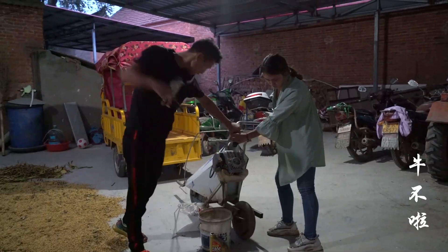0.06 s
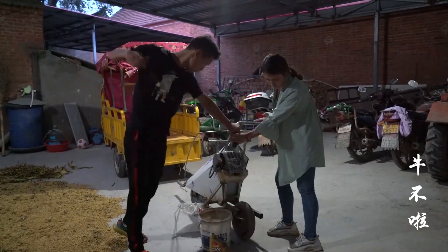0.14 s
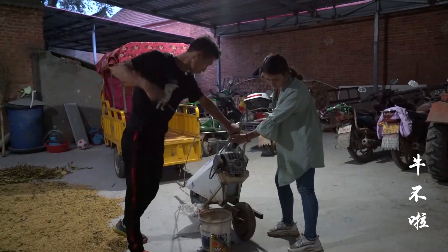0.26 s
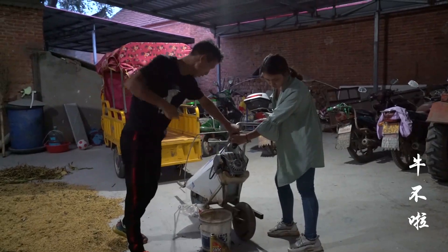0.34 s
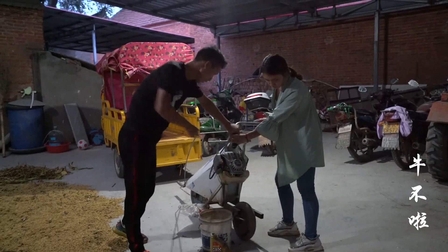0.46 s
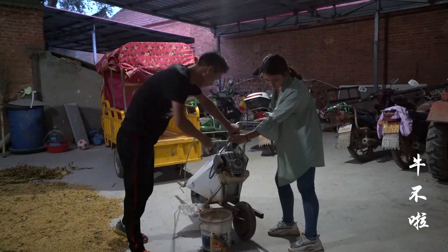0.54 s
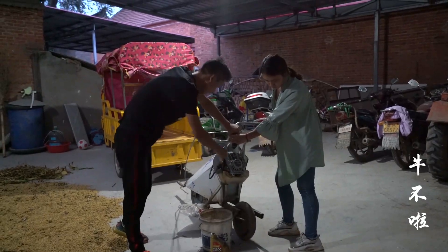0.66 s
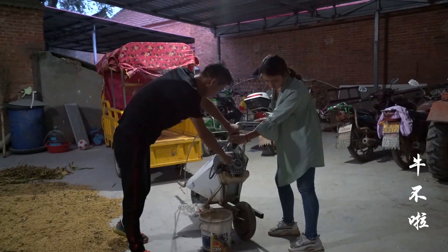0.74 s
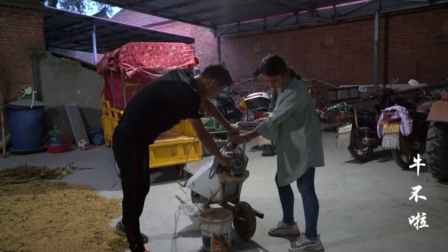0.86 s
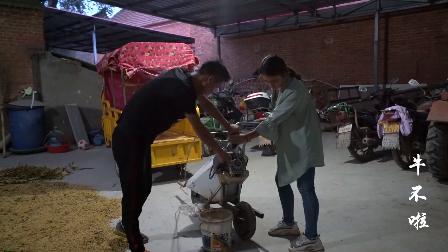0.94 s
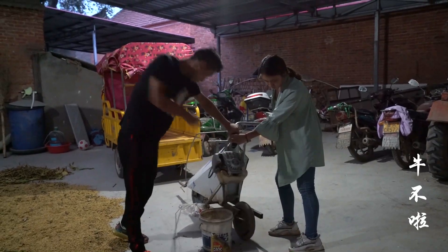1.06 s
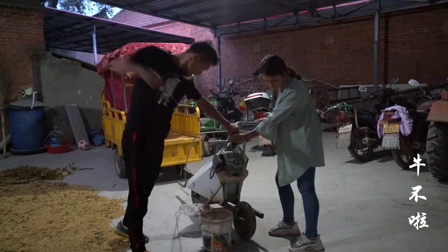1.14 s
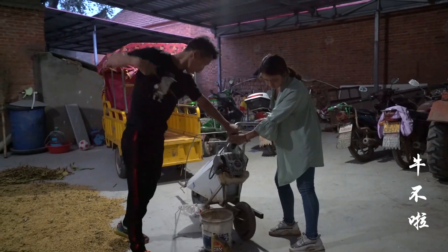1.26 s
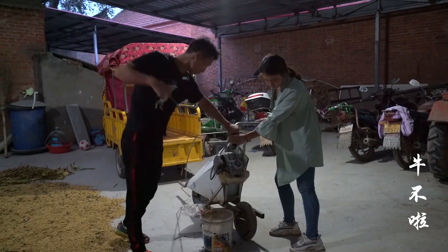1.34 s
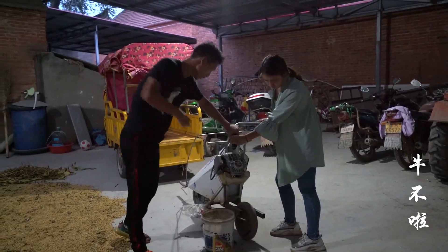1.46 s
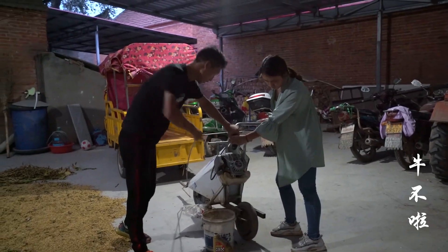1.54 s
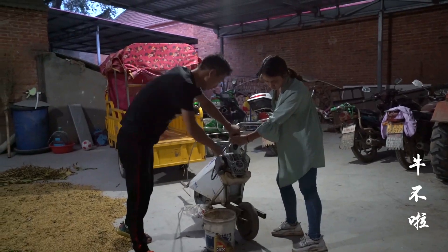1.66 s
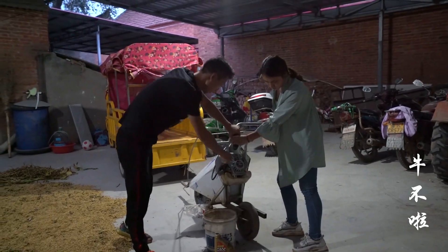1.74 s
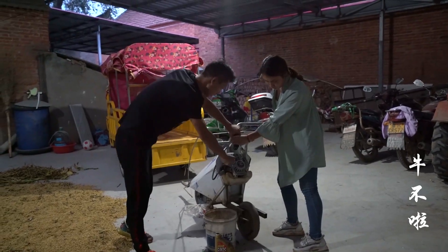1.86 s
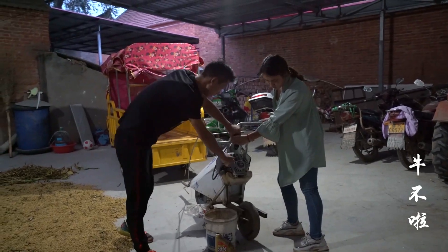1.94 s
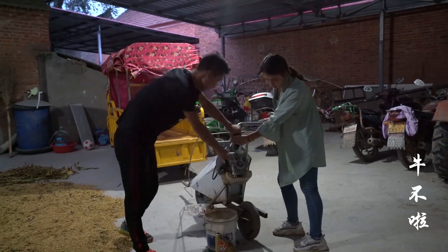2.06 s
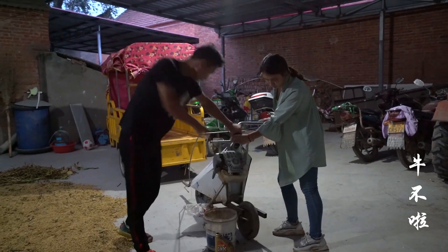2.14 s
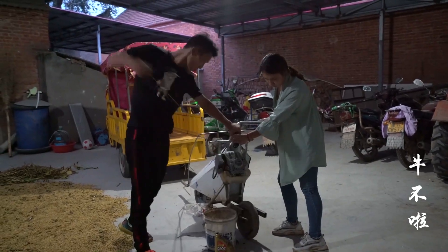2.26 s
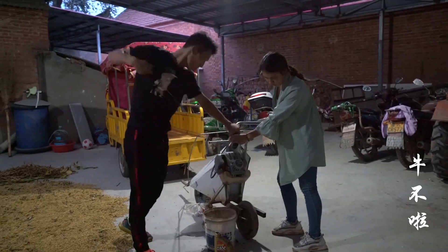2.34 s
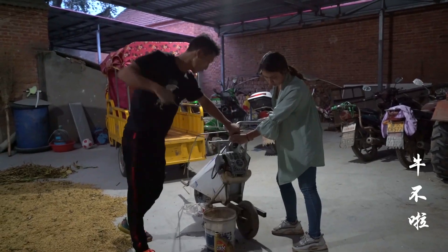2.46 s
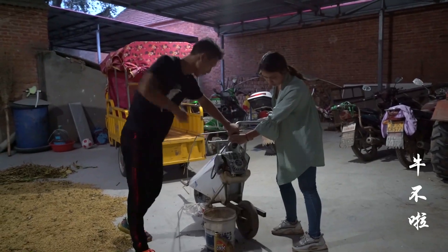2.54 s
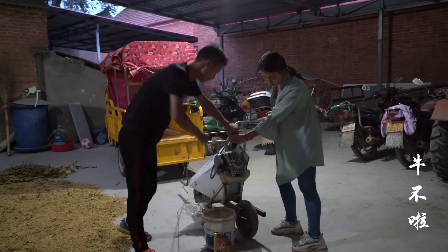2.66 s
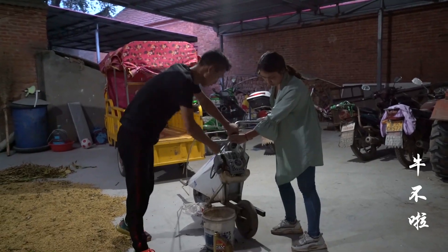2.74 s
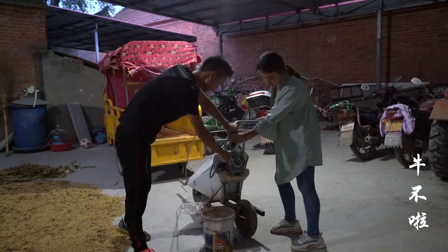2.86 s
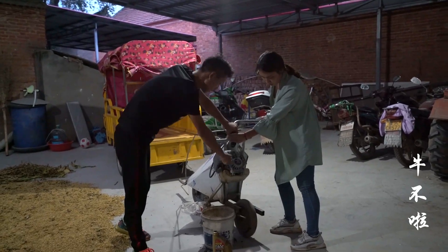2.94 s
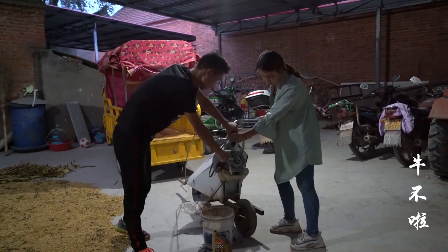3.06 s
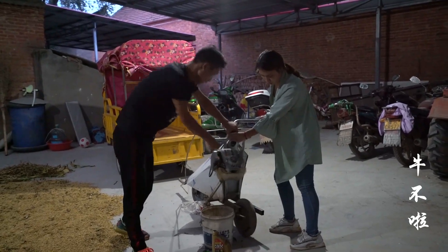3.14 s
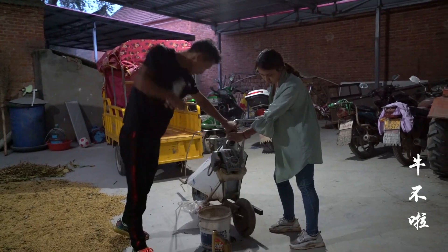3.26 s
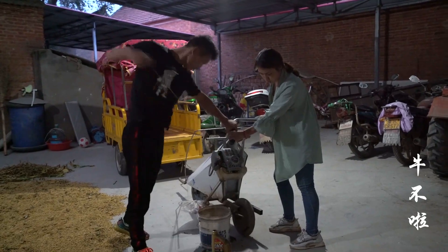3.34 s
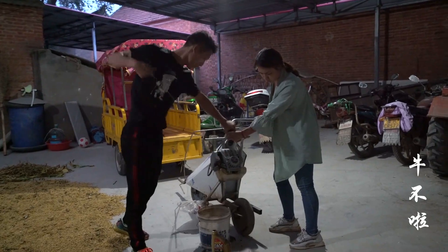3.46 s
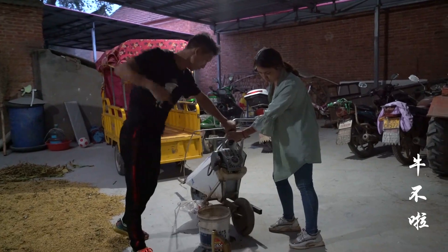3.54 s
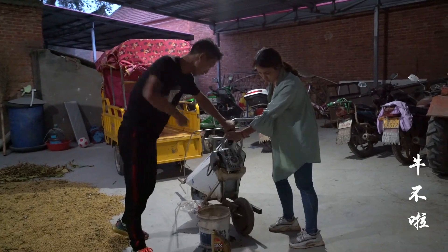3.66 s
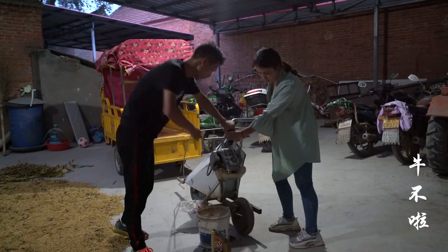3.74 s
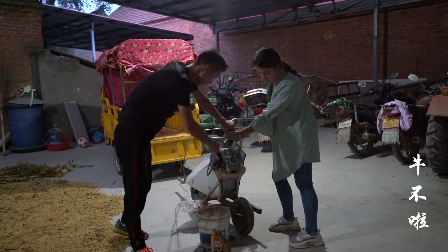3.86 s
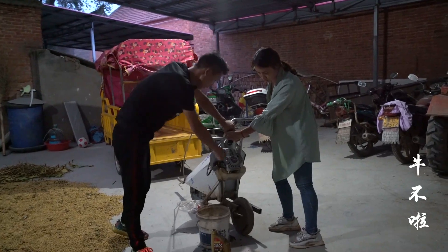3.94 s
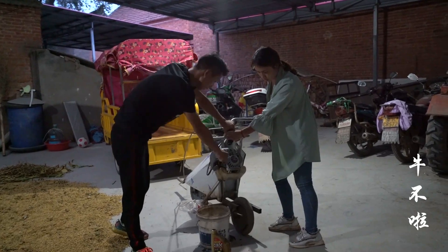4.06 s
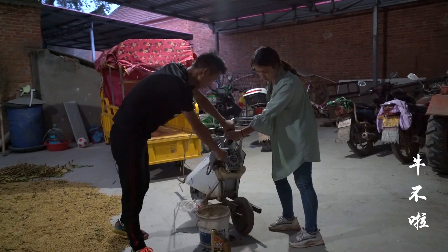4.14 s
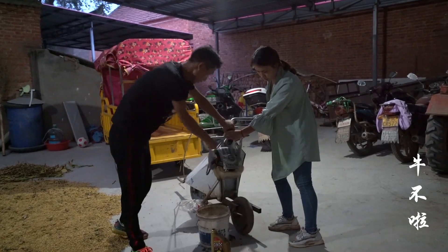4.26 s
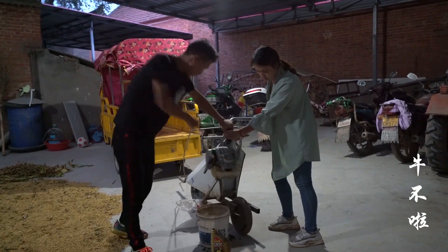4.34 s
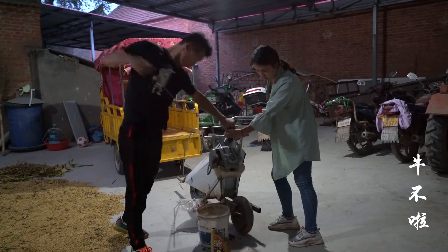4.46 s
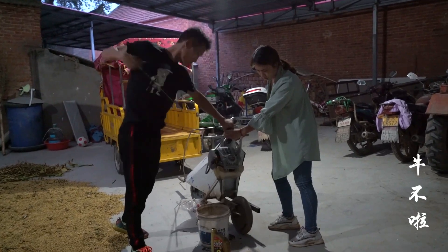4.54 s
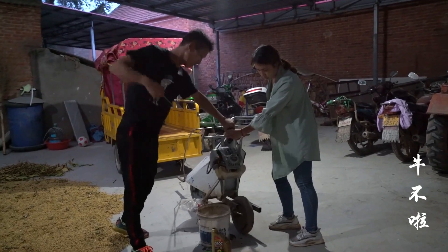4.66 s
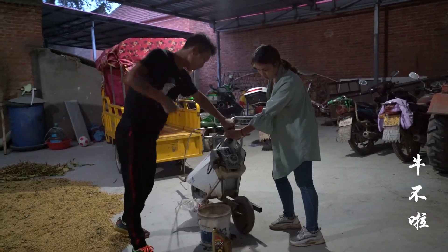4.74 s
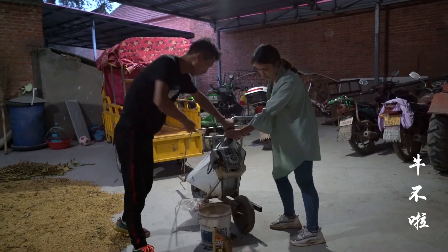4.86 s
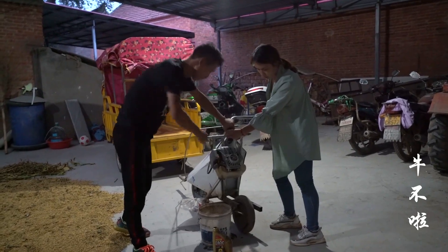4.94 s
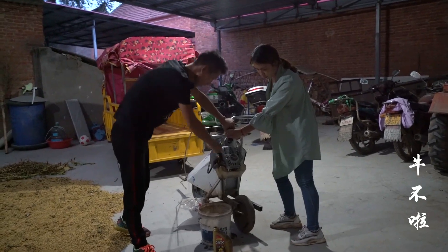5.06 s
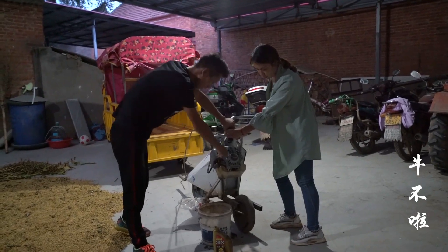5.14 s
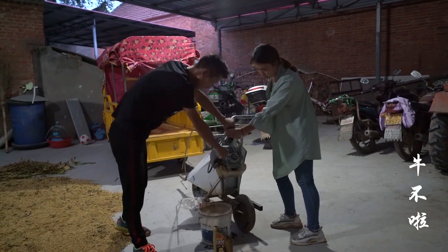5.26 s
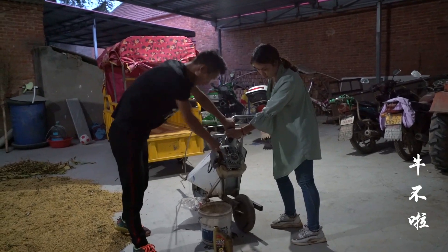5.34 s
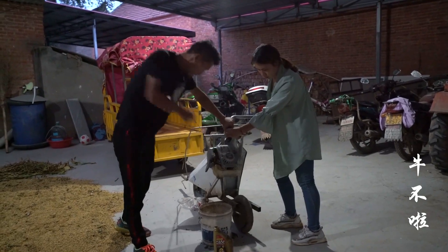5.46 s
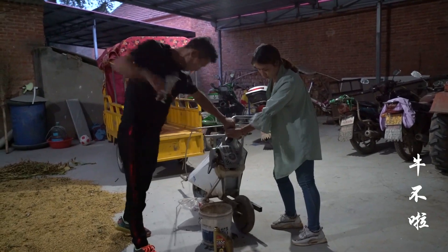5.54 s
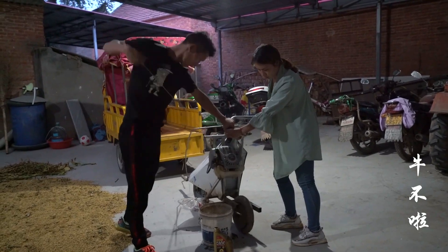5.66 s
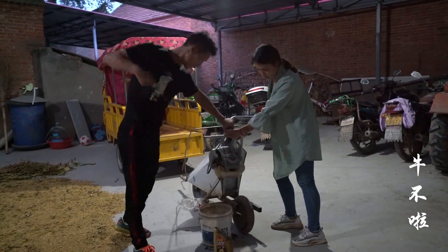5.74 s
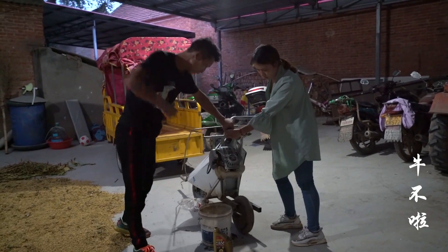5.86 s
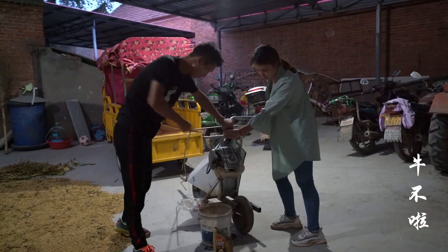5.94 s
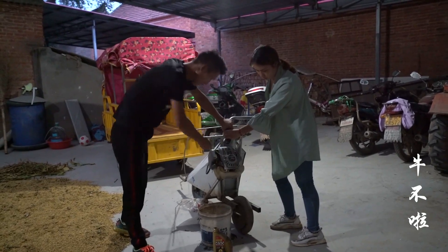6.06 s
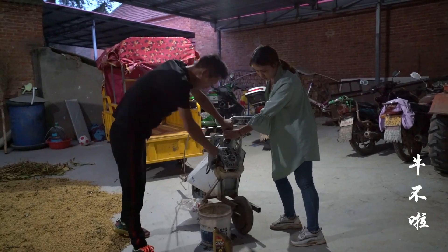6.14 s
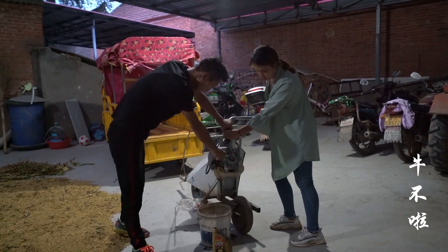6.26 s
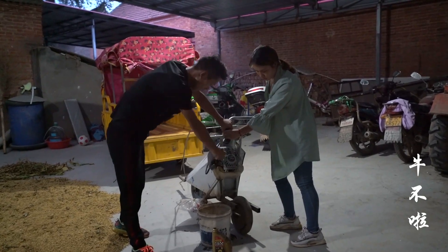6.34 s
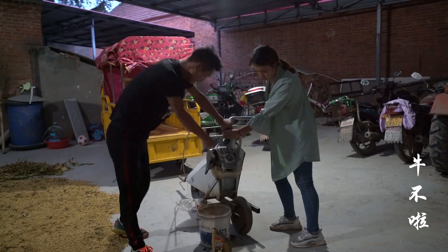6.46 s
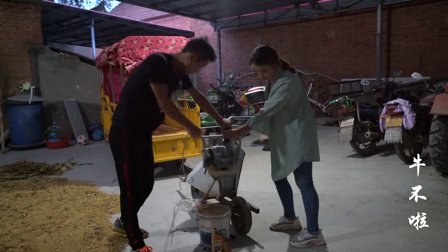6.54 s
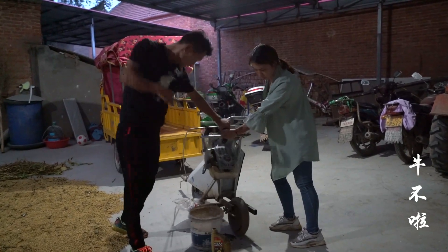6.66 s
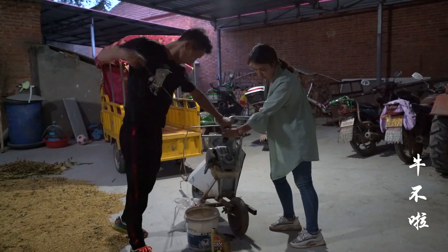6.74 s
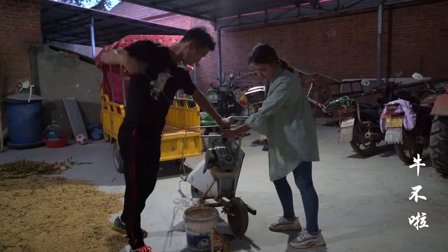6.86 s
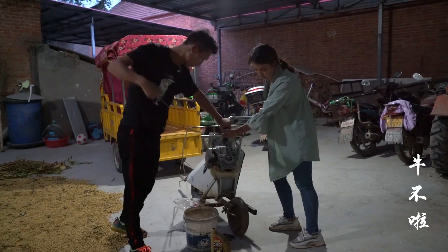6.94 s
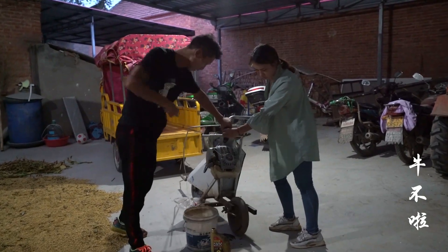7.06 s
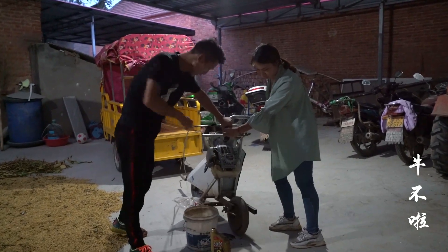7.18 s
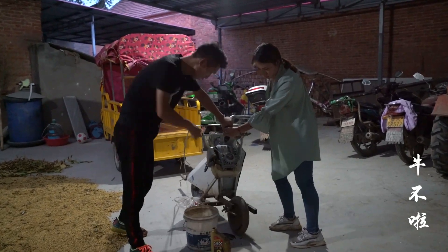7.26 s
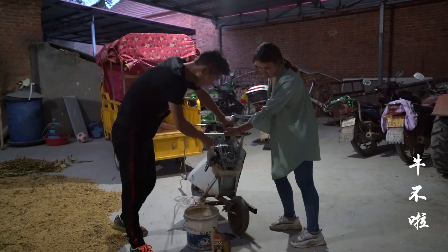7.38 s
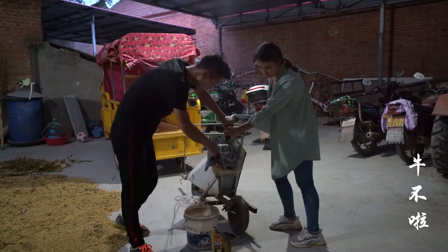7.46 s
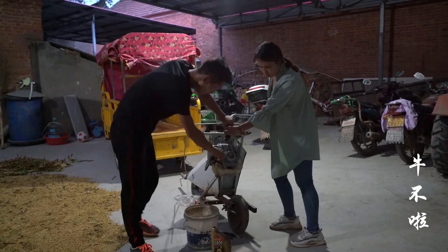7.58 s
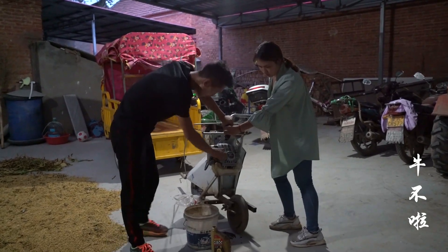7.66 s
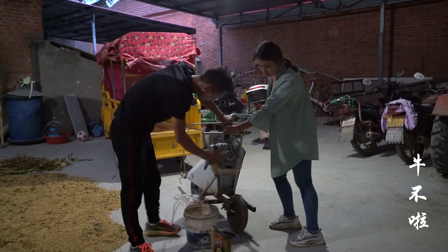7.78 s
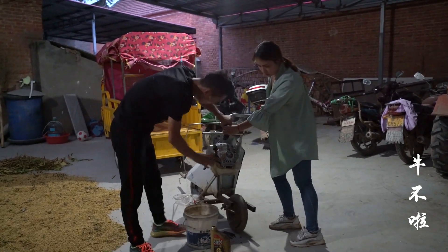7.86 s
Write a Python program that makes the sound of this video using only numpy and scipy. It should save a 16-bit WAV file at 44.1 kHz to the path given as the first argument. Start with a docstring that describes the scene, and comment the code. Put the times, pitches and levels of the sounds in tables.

```python
"""Tin-roofed shed: a small petrol engine on a cart is pull-started seven times and never fires.
Each pull: the pawls knock (filtered noise bursts), cart and casing rumble, cord and fan whirr (grainy noise
through resonances). The crank coasts down in clacks, strong and weak by turns, spreading out at the end:
noise ticks plus a ringing cover. Small steel parts ping; a dense echo follows the blows over low air noise."""
import sys
import numpy as np
from scipy import signal
from scipy.io import wavfile

SR = 44100
rng = np.random.default_rng(int(sys.argv[2]) if len(sys.argv) > 2 else 0)


def persist_wave(psi):
    """Save psi, clipped to +-1, as 16-bit WAV."""
    counts = np.round(np.clip(psi, -1, 1) * 32767).astype(np.int16)
    wavfile.write(sys.argv[1], SR, np.atleast_2d(counts).T)


N = 348813

# Pulls: cart shakes t/s, crank spins t/s, rise/s, cord runs out t/s, cart coast stretch/ratio,
# cart level/dB, casing level/dB, whirr level/dB, whirr change along cord/dB, side panels/dB, wheel thump/dB
PULLS = [(0.035, 0.025, .04, .22, 0.93, -16.5, -16, -21.5, 0, 0, 3.5),
         (1.07, 1.08, .06, 1.28, 1.18, -17.5, -17.5, -26.5, 2, 1.5, 5.5),
         (2.19, 2.18, 0.033, 2.377, .95, -13, -16, -22, -1, 1.5, 2),
         (3.228, 3.228, 0.025, 3.434, 1.02, -9.5, -18.5, -24, 0.7, 3, 0.7),
         (4.368, 4.368, .01, 4.577, 1.075, -12, -18.5, -26, 2, 1.5, 2),
         (5.47, 5.47, 0.039, 5.7, 0.99, -11, -18, -25.5, -0.5, 0.5, 1.2),
         (6.56, 6.64, 0.044, 6.85, 0.84, -12, -18, -21.5, -4, 5.5, 0.7)]
# Pawls catch as the cord goes taut: t/s, level/dB, knock f/Hz, scuffing after it/dB
CATCHES = [(1.036, 7.5, 1550, -19.5), (2.143, 8, 1360, -20), (3.159, 1.5, 1260, -26),
           (4.273, -7.5, 1130, -34), (5.42, 6.5, 1660, -23), (6.478, 2, 1350, -24.5),
           (7.639, -11, 1300, -31.5)]
# Small steel part rings during or at the end of a pull: t/s, f/Hz, level/dB
PINGS = [(.208, 7770, -28), (.23, 8700, -34), (4.585, 8700, -35), (5.71, 8700, -33), (6.697, 7400, -18)]
# Cart frame modes: f/Hz, width/Hz, level/dB
CART_MODES = [(156.7, 33.8, 0), (193.3, 14.3, 2), (228, 14.9, 3.5), (292.5, 14.3, 1), (341.2, 10, -3.5)]
# Side panel modes: f/Hz, width/Hz, level/dB
PANEL_MODES = [(390.7, 17.3, -3), (436.4, 24, -4), (533, 30.5, -9), (577, 29, -5.5), (751, 280, -14.5)]
# Wheel modes: f/Hz, width/Hz, level/dB
WHEEL_MODES = [(68, 41, -14), (100, 49, -10)]
# Engine casing modes: f/Hz, width/Hz, level/dB
CASING_MODES = [(1102, 315, -3.5), (1349, 193, 0.5), (1630, 103, -0.5), (1800, 134, -0.5), (2165, 380, -15)]
# Fan and starter housing modes: f/Hz, width/Hz, level/dB
HOUSING_MODES = [(2470, 1070, 1.5), (4110, 1440, 0.5), (4990, 840, 1), (6780, 4570, -13.5),
                 (9090, 1980, -14)]
# Pawl modes: f/Hz, width/Hz, level/dB
PAWL_MODES = [(1160, 500, -0.5), (2570, 970, -6)]
# Shed echo bands: f/Hz, t60/s, level/dB
SHED_BANDS = [(1380, 0.19, -17), (3880, 1, -13), (9600, 0.097, -11)]
# Dying down once the cord runs out: t after/s, cart change/dB, casing change/dB, whirr change/dB
COAST = [(.06, -3.5, -8, -9), (0.319, -11.5, -9.5, -22), (.6, -21, -20, -22.5), (.85, -28.5, -25.5, -25),
         (1.3, -46, -56, -50)]
# Strong clack each turn, one list per pull: t/s, tick level/dB, cover level/dB
TURNS = [
    [(0.3006, -7.5, -7), (0.384, -6.5, -2.5), (0.4714, -9.5, -4), (0.566, -9, -7.5), (0.674, -20, -35)],
    [(1.3701, -9, -9), (1.4561, -5, -2.5), (1.5336, -8.5, -5), (1.6225, -9.5, -9.5), (1.729, -14.5, -24)],
    [(2.4726, -9, -8), (2.5536, -6, -2.5), (2.6273, -7, -7.5), (2.7135, -10.5, -9), (2.814, -17.5, -26)],
    [(3.5508, -10, -10.5), (3.634, -6, -3.5), (3.716, -9, -6), (3.806, -12.5, -7.5), (3.911, -20, -24)],
    [(4.6788, -9.5, -8), (4.7671, -9, -3), (4.8643, -10, -3), (4.9644, -11, -10), (5.0794, -17.5, -30)],
    [(5.7922, -7.5, -5), (5.8788, -7.5, -0.5), (5.9606, -7.5, -4.5), (6.0475, -10, -8), (6.1516, -16, -20)],
    [(6.9548, -5.5, -6), (7.0402, -11.5, -10), (7.1651, -12.5, -6), (7.3007, -14, -11),
     (7.4547, -23.5, -20)],
]
# Single clacks as cord jerks, crank rocks to rest, pawls shift: t/s, tick level/dB
JERKS = [(0.2063, -4.5), (0.7487, -18), (0.786, -15.5), (0.7984, -10), (1.002, -21), (1.013, -11),
         (1.1635, -7.5), (1.247, -10), (1.2716, -7), (1.8098, -17.5), (1.84, -18), (1.926, -19.5),
         (2.109, -18), (2.118, -11), (2.347, -6), (2.3708, -11), (2.894, -20), (2.9452, -20),
         (2.955, -14.5), (3.131, -22), (3.1433, -18), (3.235, -6), (3.986, -18.5), (4.031, -20.5),
         (4.046, -14), (4.258, -23), (4.3805, -5), (4.5781, -5.5), (5.17, -20), (5.217, -16),
         (5.228, -16.5), (5.355, -21), (5.3653, -17.5), (5.707, -3.5), (6.2332, -17.5), (6.273, -19),
         (6.29, -15.5), (6.436, -23), (6.446, -15.5), (6.675, 0), (6.707, -2.5), (7.5736, -23),
         (7.619, -27), (7.685, -30)]

AIR_DB, AIR_HZ, AIR_WIDTH_HZ = -42, 42.0, 124.0
ECHO_DELAY_S = 0.004
PING_SHAKE_T60_S, PING_WIDTH_HZ = 0.25, 160
PAWL_KNOCK_WIDTH_HZ = 270
COVER_HZ, COVER_WIDTH_HZ, COVER_PUSH_S, COVER_PITCH_SPREAD = 1323, 98, 0.004, 0.017
# weak clack: share of the turn, levels against the strong one before it
WEAK_AT_SHARE, WEAK_TICK_DB, WEAK_COVER_DB = 0.477, -2, -10.5
SINGLE_COVER_DB = -8.5  # cover against tick, jerks and strokes
# pawl strokes while the cord is drawn; slip in stroke spacings
STROKES, STROKE_DB, STROKE_SPREAD_DB, STROKE_SLIP = 12, -14.5, 4, 0.3
# each tick stirs the modes differently; softer ones are duller
COLOUR_SPREAD_DB, DULL_DB_PER_DB = 2, 0.43
TICK_CASING_DB = 5.5
SWELL_DB = (2.5, -2.5)  # cart, casing: change while the cord is drawn
PANEL_FADE_EXPONENT = 0.16  # panels fall silent faster than the frame
SCUFF_DB, SCUFF_FALL_DB_PER_S = (-7.5, -1.5, -7.5), 72  # share reaching cart, casing, whirr
OPENING_SCUFF = (0, -22)  # still dying at the start: t/s, level/dB
PEAK_LIMIT = 0.63
SIDE_DB, SIDE_HZ, SIDE_WIDTH_HZ, SIDE_DELAY_SAMPLES = -31, 8500.0, 5000.0, 400
TOP_HZ = 11150


def undb(db):
    """Decibels to gain."""
    return 10 ** (np.asarray(db) / 20)


def unit(x):
    """Scales to rms 1."""
    return x / np.sqrt(np.mean(x ** 2))


def ring(x, hz, width_hz):
    """One resonance, gain 1 at its centre."""
    return signal.lfilter(*signal.iirpeak(hz, hz / width_hz, SR), x)


def body(x, modes):
    """Parallel resonances, neighbours in opposite phase."""
    return sum((-1) ** k * undb(db) * ring(x, hz, width_hz) for k, (hz, width_hz, db) in enumerate(modes))


def stirred(modes, change_db):
    """The same modes with each level shifted."""
    return [(hz, width_hz, db + change) for (hz, width_hz, db), change in zip(modes, change_db)]


def jolts(rate_per_s, spread_db, smear_s):
    """Noise in decaying grains of uneven strength, at random times."""
    struck = rng.random(N) < rate_per_s / SR
    hits = struck * undb(spread_db * rng.exponential(size=N))
    grain = signal.lfilter([1], [1, -np.exp(-1 / (smear_s * SR))], hits)
    return grain * rng.standard_normal(N)


def burst(rows, rise_s, fall_s):
    """A short scrape of noise per blow."""
    t = np.arange(3000) / SR
    noise = rng.standard_normal((rows, len(t)))
    return noise * (1 - np.exp(-t / rise_s)) * np.exp(-t / fall_s)


def strike(times_s, levels_db, shape):
    """Lays one sound per blow, its peak at the given level."""
    out = np.zeros(N + SR)
    for k, (time_s, db) in enumerate(zip(times_s, levels_db)):
        blow = shape(k)
        start = int(time_s * SR)
        out[start:start + len(blow)] += undb(db) * blow / np.abs(blow).max()
    return out[:N]


def air():
    """Low stir of air: noise through one broad resonance."""
    return undb(AIR_DB) * unit(ring(rng.standard_normal(N), AIR_HZ, AIR_WIDTH_HZ))


def shed(x):
    """Roof and walls send back a dense echo: noise bands, each fading at its own rate."""
    t = np.arange(SR // 2) / SR
    tail = 0
    for hz, t60_s, db in SHED_BANDS:
        fade = np.exp(-np.log(1000) * t / t60_s) * (t > ECHO_DELAY_S)
        band = ring(rng.standard_normal(len(t)), hz, 1.5 * hz) * fade
        tail = tail + undb(db) * band / np.sqrt(np.sum(band ** 2))
    return signal.fftconvolve(x, tail)[:N]


def pings():
    """A high steel mode, shaken by fading noise."""
    times_s, hz, db = np.transpose(PINGS)
    t = np.arange(SR // 2) / SR
    fade = np.exp(-np.log(1000) * t / PING_SHAKE_T60_S)
    shake = rng.standard_normal((len(times_s), len(t))) * fade

    def ping(k):
        once = ring(shake[k], hz[k], PING_WIDTH_HZ)
        return ring(once, hz[k], PING_WIDTH_HZ)

    return strike(times_s, db, ping)


def catches():
    """Pawl knock: a hard, dry scrape, one main resonance in broad ones."""
    times_s, db, hz, _ = np.transpose(CATCHES)
    scrape = burst(len(times_s), rise_s=0.0011, fall_s=0.0032)
    bright_db = -12.0 + 0.24 * db  # softer blows are duller

    def knock(k):
        main = ring(scrape[k], hz[k], PAWL_KNOCK_WIDTH_HZ)
        bright = undb(bright_db[k]) * body(scrape[k], HOUSING_MODES)
        return main + body(scrape[k], PAWL_MODES) + bright

    return strike(times_s, db, knock)


def clack_rows():
    """Times/s, tick levels/dB, cover levels/dB: strong, weak and single clacks, cord strokes."""
    strong = np.transpose(TURNS, (2, 0, 1))
    times_s, tick_db, cover_db = strong
    weak = [times_s[:, :-1] + WEAK_AT_SHARE * np.diff(times_s),
            tick_db[:, :-1] + WEAK_TICK_DB,
            cover_db[:, :-1] + WEAK_COVER_DB]

    _, spins_s, rise_s, end_s = np.transpose(PULLS)[:4, :, None]
    slip, size = rng.standard_normal((2, len(PULLS), STROKES))
    along = (np.arange(STROKES) + 0.5 + STROKE_SLIP * slip) / STROKES
    full_s = spins_s + rise_s
    stroke_s = full_s + along * (end_s - full_s)
    stroke_db = STROKE_DB + STROKE_SPREAD_DB * size

    jerk_s, jerk_db = np.transpose(JERKS)
    single_db = np.r_[jerk_db, stroke_db.ravel()]
    single = [np.r_[jerk_s, stroke_s.ravel()], single_db, single_db + SINGLE_COVER_DB]
    return [np.r_[a.ravel(), b.ravel(), c] for a, b, c in zip(strong, weak, single)]


def clacks():
    """Noise tick through housing and casing; a brief sine push rings the thin cover, pitch varying."""
    times_s, tick_db, cover_db = clack_rows()
    count = len(times_s)
    scrape = burst(count, rise_s=0.0016, fall_s=0.003)
    pitch_hz = COVER_HZ * (1 + COVER_PITCH_SPREAD * rng.standard_normal(count))
    stir_db = COLOUR_SPREAD_DB * rng.standard_normal((count, len(HOUSING_MODES + CASING_MODES)))
    t = np.arange(2500) / SR

    def cover(k):
        push = np.sin(2 * np.pi * pitch_hz[k] * t) * (t < COVER_PUSH_S)
        return ring(push, pitch_hz[k], COVER_WIDTH_HZ)

    def tick(k):
        housing_db = stir_db[k] + DULL_DB_PER_DB * tick_db[k]
        housing = body(scrape[k], stirred(HOUSING_MODES, housing_db))
        casing = body(scrape[k], stirred(CASING_MODES, stir_db[k, len(HOUSING_MODES):]))
        return housing + undb(TICK_CASING_DB) * casing

    return strike(times_s, cover_db, cover) + strike(times_s, tick_db, tick)


def effort(t):
    """Gains of cart, casing, whirr: pulls rise, drift and coast, catches leave scuffing; powers add."""
    power = np.zeros((3, N))
    after_s, *coast_db = np.transpose(COAST)
    for shakes_s, spins_s, rise_s, end_s, stretch, *db in PULLS:
        full_s = spins_s + rise_s
        starts_s = (shakes_s, spins_s, spins_s)
        changes_db = (*SWELL_DB, db[3])
        for k, (start_s, change_db, slow) in enumerate(zip(starts_s, changes_db, (stretch, 1, 1))):
            knots_s = [start_s, end_s, *(end_s + slow * after_s)]
            shape_db = np.interp(t, knots_s, [0, change_db, *(change_db + coast_db[k])])
            ramp = np.clip((t - start_s) / (full_s - start_s), 0, 1)
            power[k] += (ramp * undb(db[k] + shape_db)) ** 2
    for time_s, *_, db in [OPENING_SCUFF, *CATCHES]:
        fall_db = db - SCUFF_FALL_DB_PER_S * np.clip(t - time_s, 0, None)
        power += ((t > time_s) * undb(np.array(SCUFF_DB)[:, None] + fall_db)) ** 2
    return np.sqrt(power)


def turning():
    """Cart shudder, casing rattle, cord and fan whirr: random jolts through each body's modes."""
    t = np.arange(N) / SR
    cart_gain, casing_gain, whirr_gain = effort(t)
    start_s, panel_db, wheel_db = np.transpose(PULLS)[[0, -2, -1]]
    pull = np.clip(np.searchsorted(start_s, t) - 1, 0, None)  # index of the current pull

    shake = jolts(rate_per_s=740.0, spread_db=0.7, smear_s=0.011)
    panel_gain = undb(panel_db)[pull] * (cart_gain / cart_gain.max()) ** PANEL_FADE_EXPONENT
    panels = panel_gain * body(shake, PANEL_MODES)
    wheels = undb(wheel_db)[pull] * body(shake, WHEEL_MODES)
    cart = unit(body(shake, CART_MODES) - panels + wheels)

    casing = unit(body(jolts(rate_per_s=580.0, spread_db=0.0, smear_s=0.0039), CASING_MODES))
    whirr = unit(body(jolts(rate_per_s=1300.0, spread_db=2.5, smear_s=0.0045), HOUSING_MODES))
    return cart_gain * cart + casing_gain * casing + whirr_gain * whirr


def scene():
    """Air, blows with their echo, and the turning machine, all centred."""
    blows = pings() + catches() + clacks()
    mid = air() + blows + shed(blows) + turning()
    return np.array([mid, mid])


def record(dry):
    """Peaks rounded, a faint treble width added, top cut."""
    x = PEAK_LIMIT * np.tanh(dry / PEAK_LIMIT)
    delayed = np.roll(x[0], SIDE_DELAY_SAMPLES)
    side = undb(SIDE_DB) * ring(delayed, SIDE_HZ, SIDE_WIDTH_HZ)
    x = x + side * np.array([[1], [-1]])
    low_pass = signal.ellip(10, 0.2, 45, TOP_HZ, fs=SR, output="sos")  # order, ripple/dB, stop/dB
    return signal.sosfilt(low_pass, x)


dry = scene()
out = record(dry)
persist_wave(out)
```